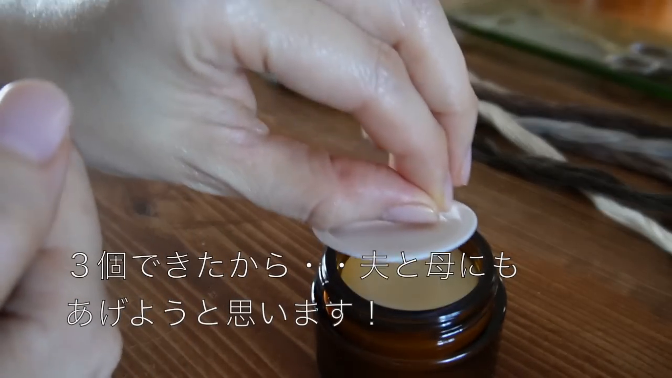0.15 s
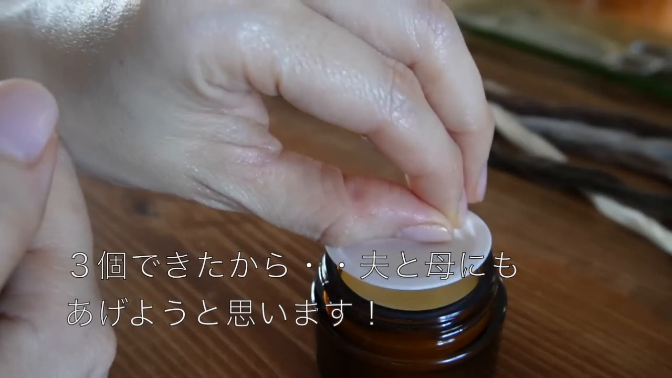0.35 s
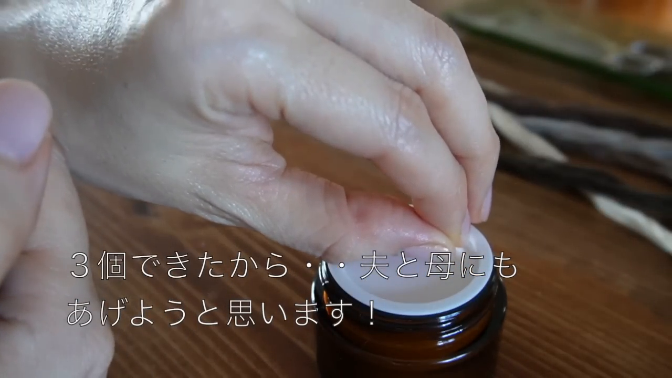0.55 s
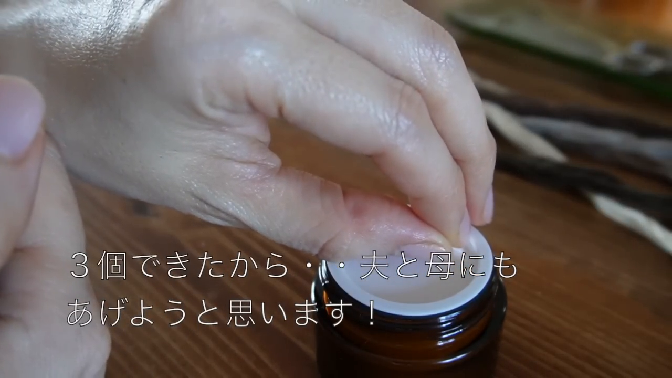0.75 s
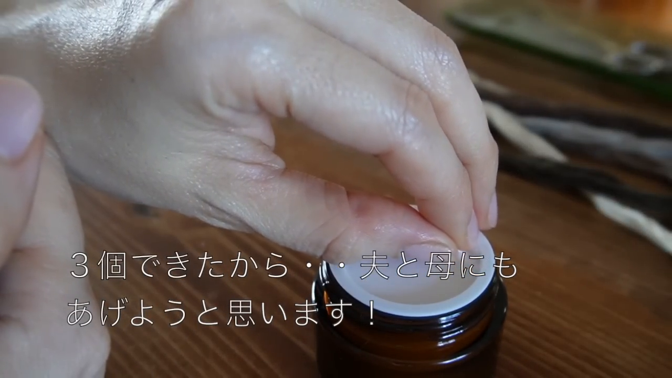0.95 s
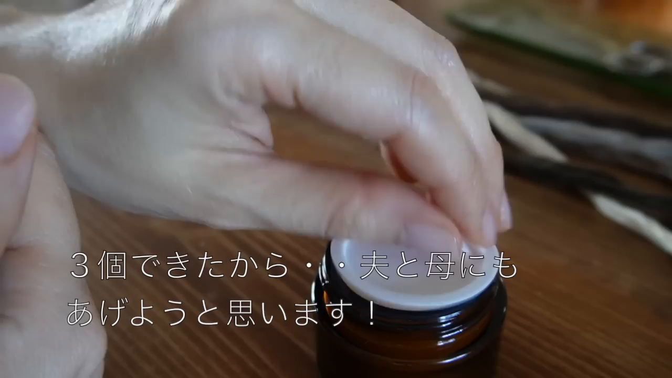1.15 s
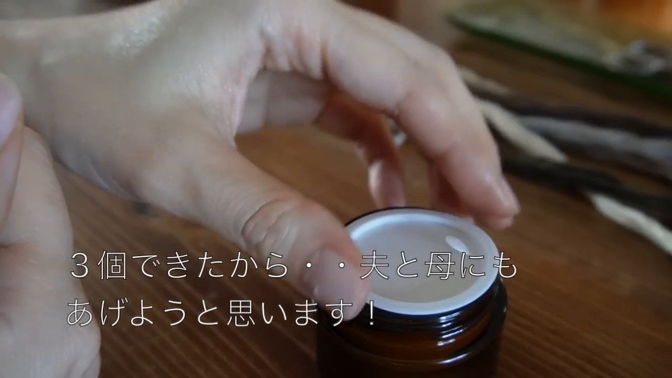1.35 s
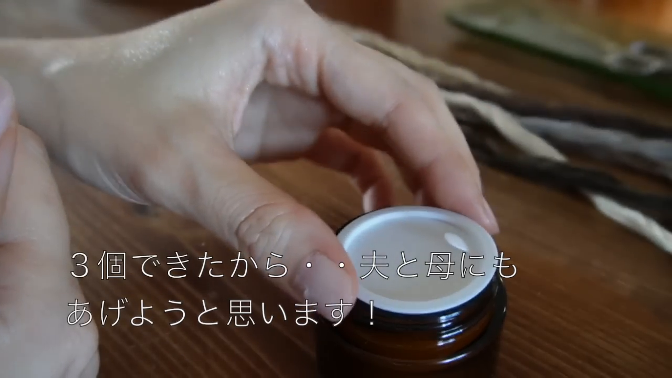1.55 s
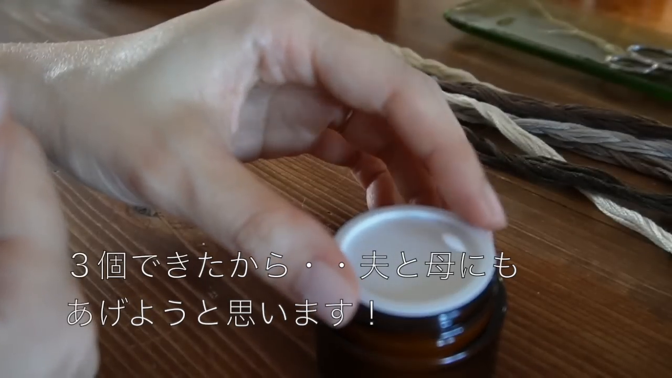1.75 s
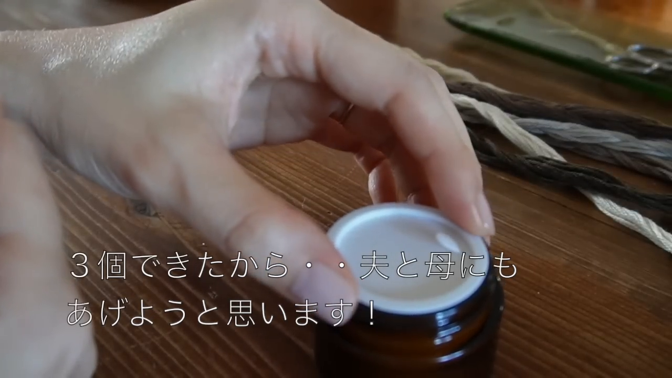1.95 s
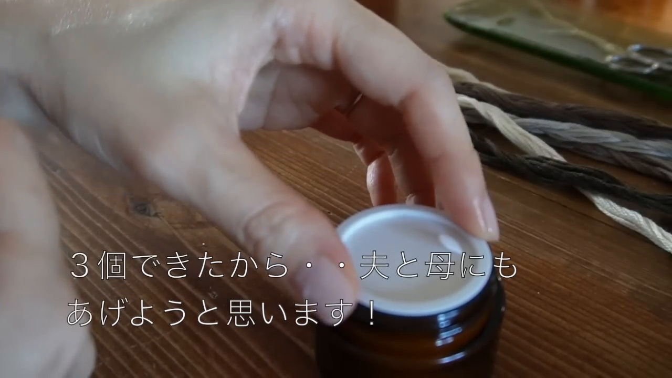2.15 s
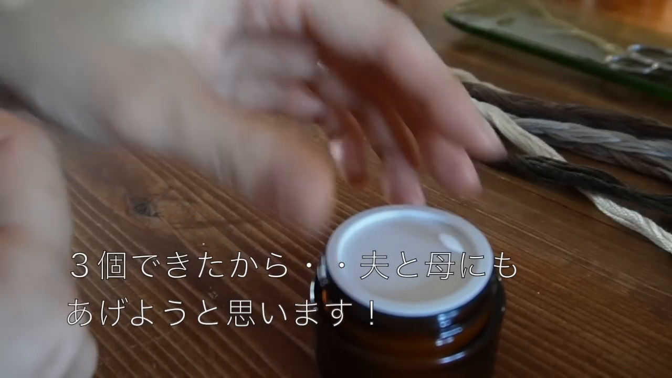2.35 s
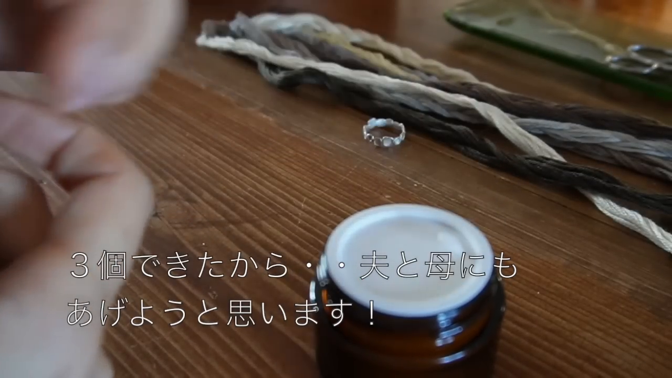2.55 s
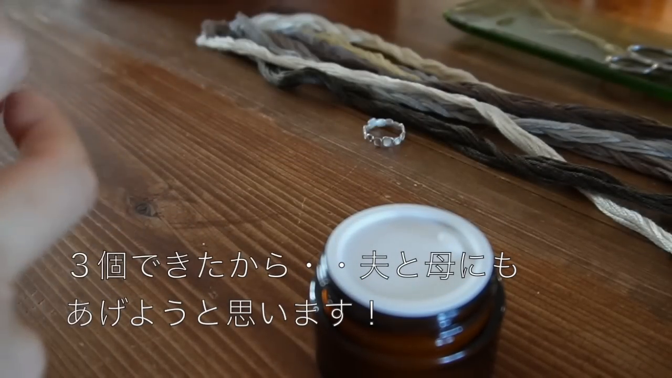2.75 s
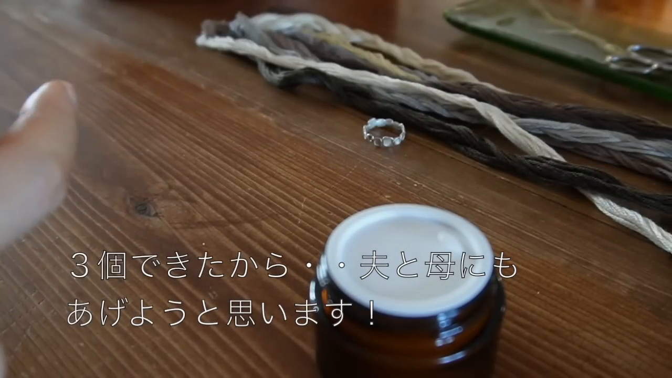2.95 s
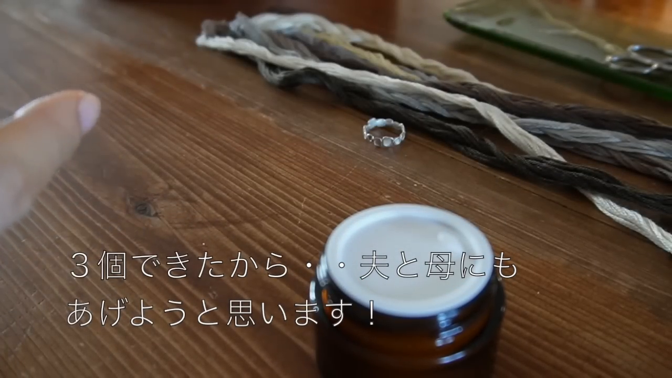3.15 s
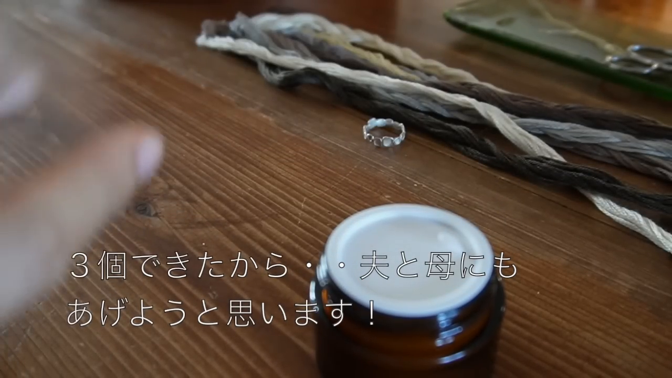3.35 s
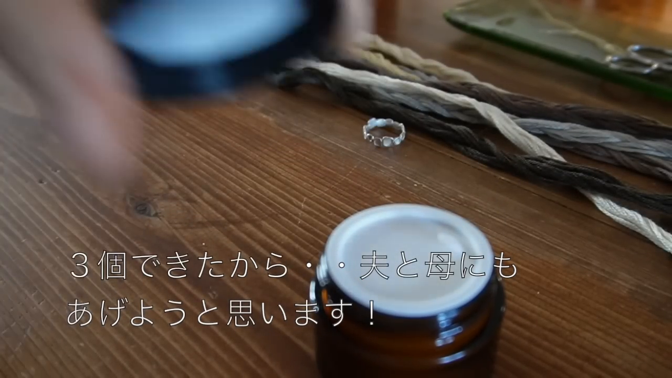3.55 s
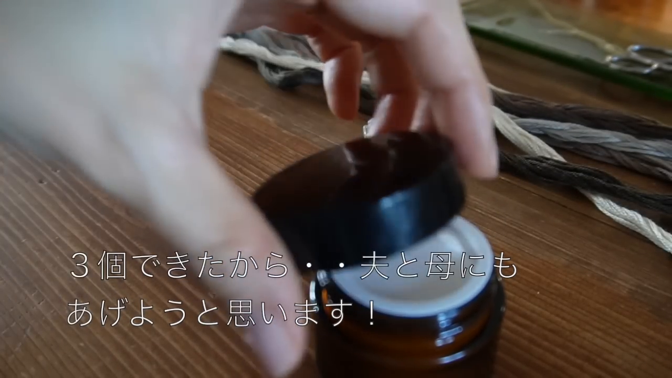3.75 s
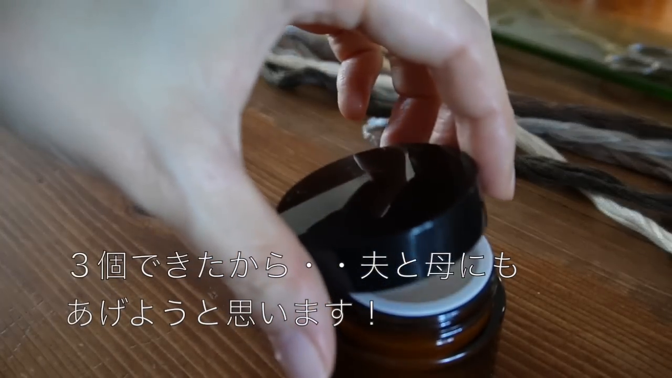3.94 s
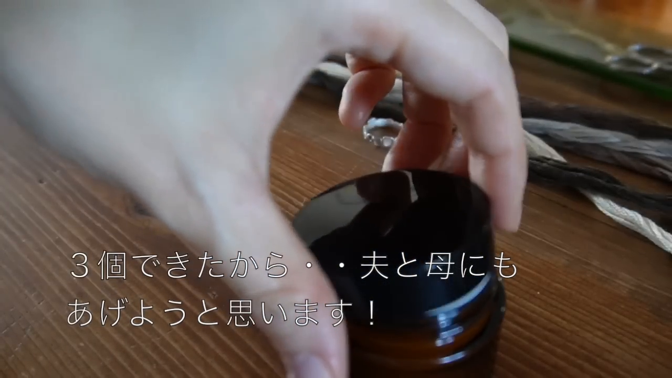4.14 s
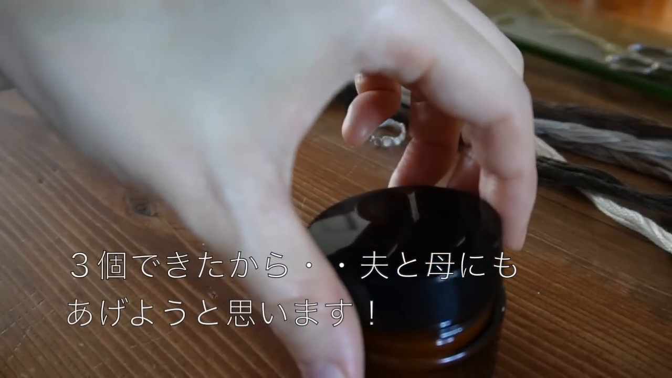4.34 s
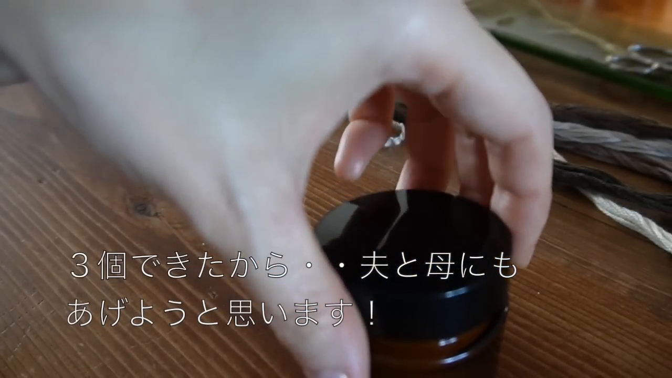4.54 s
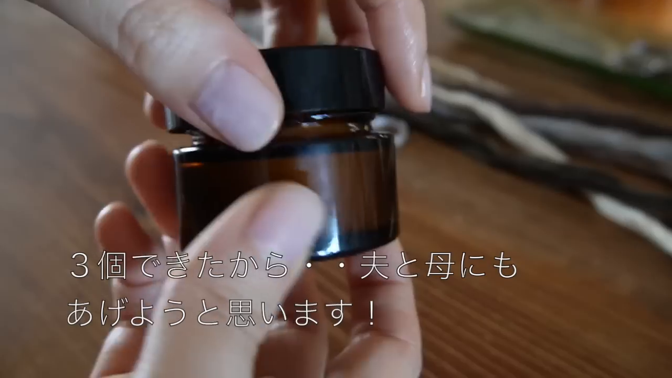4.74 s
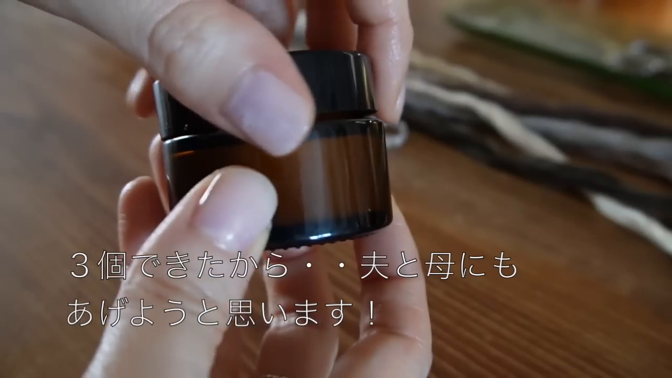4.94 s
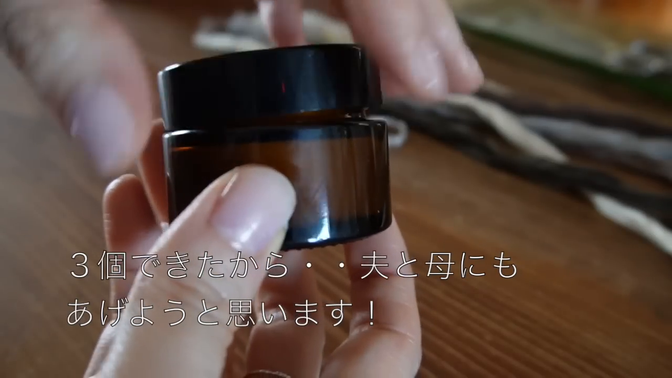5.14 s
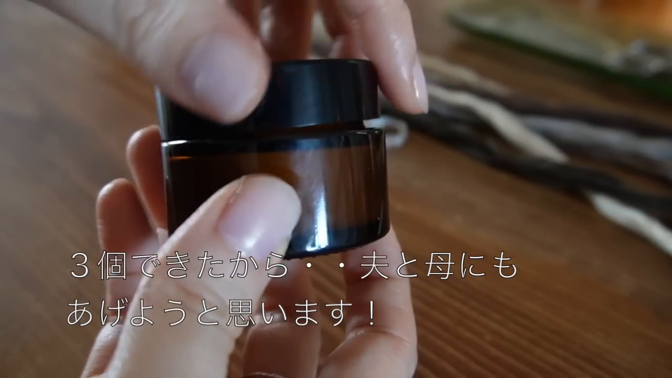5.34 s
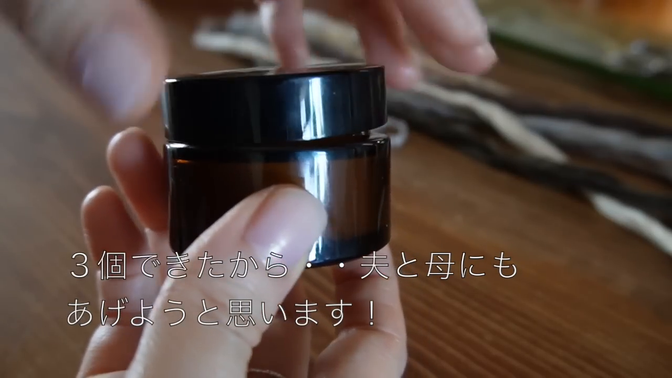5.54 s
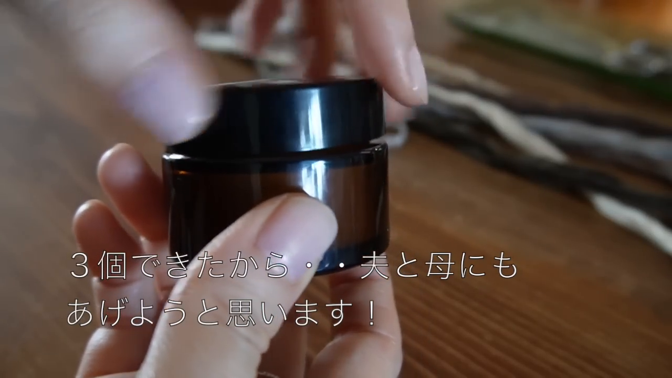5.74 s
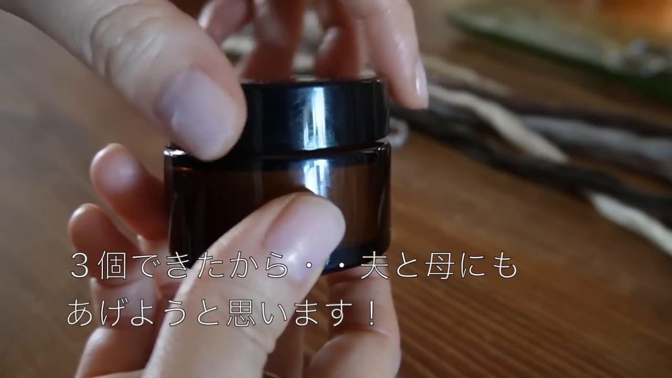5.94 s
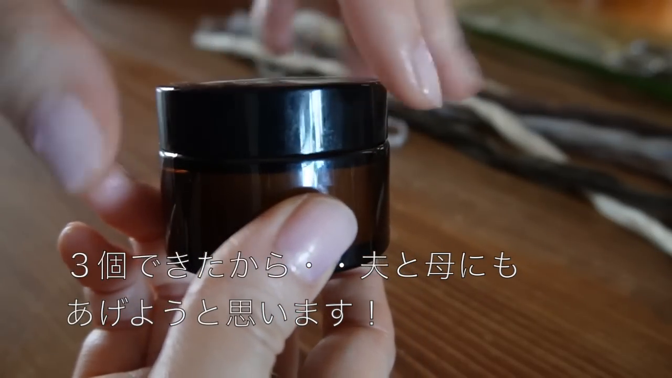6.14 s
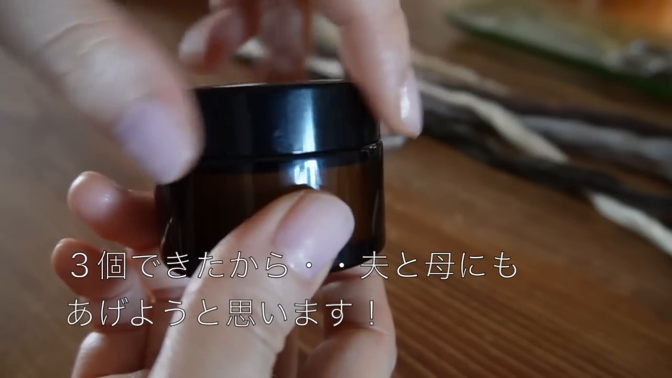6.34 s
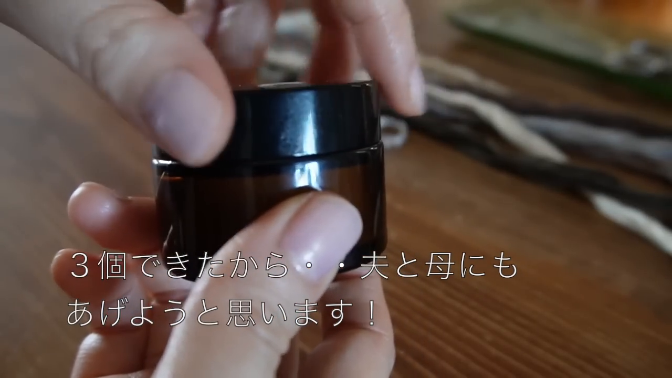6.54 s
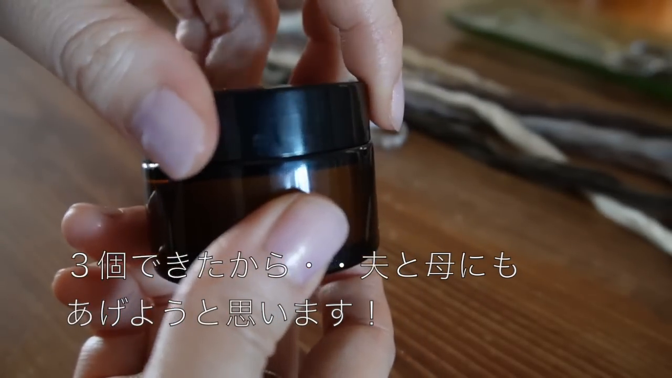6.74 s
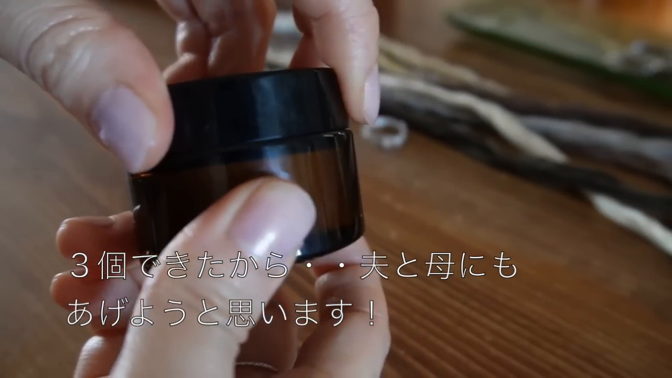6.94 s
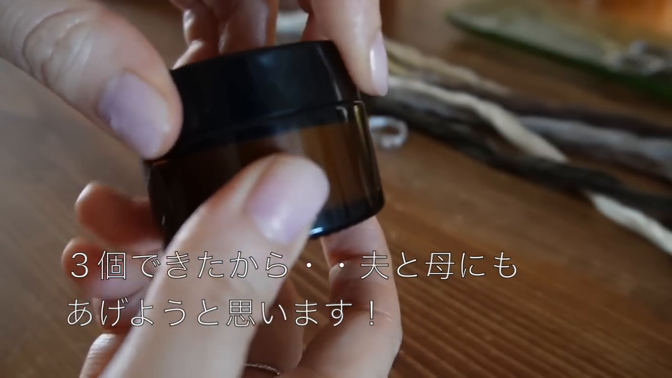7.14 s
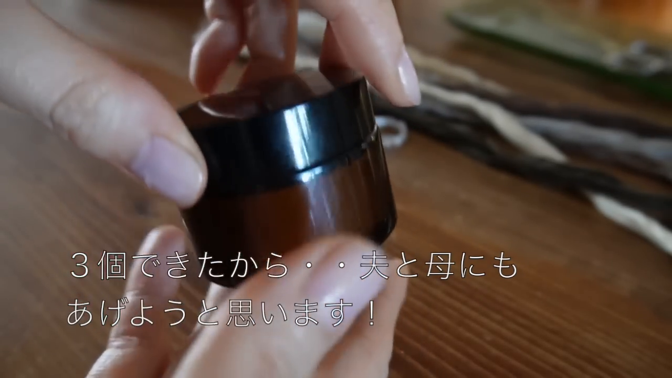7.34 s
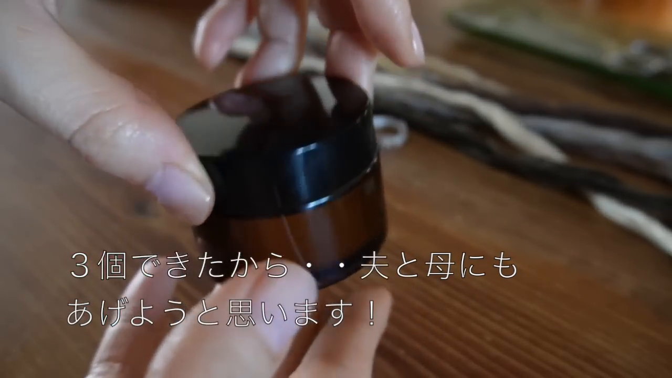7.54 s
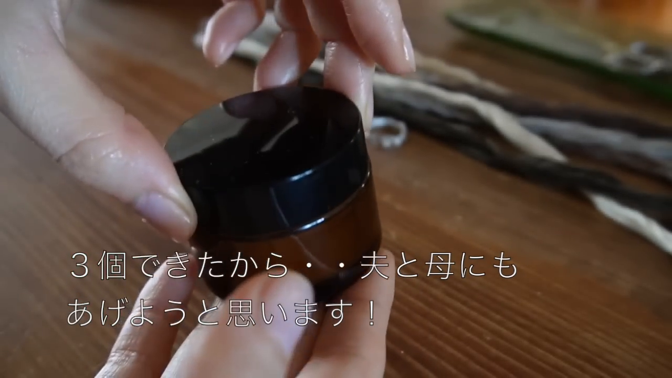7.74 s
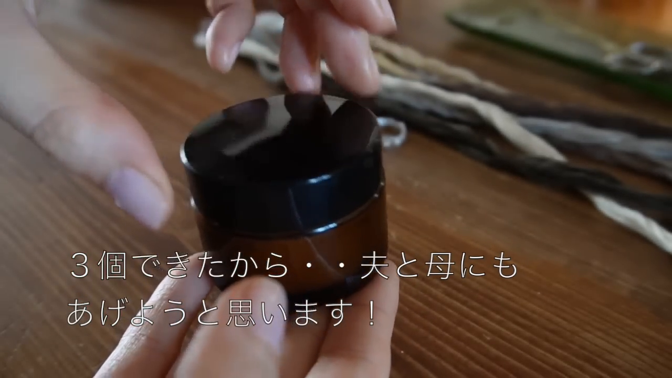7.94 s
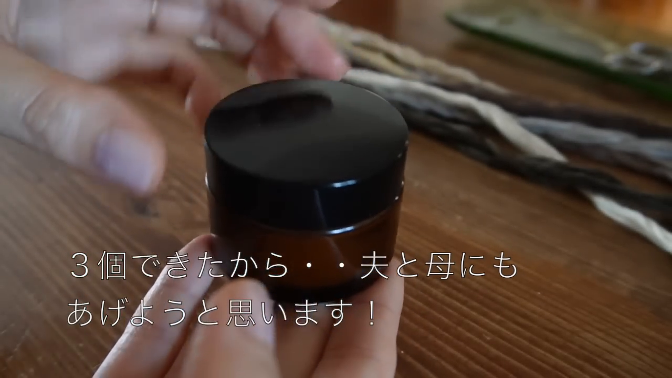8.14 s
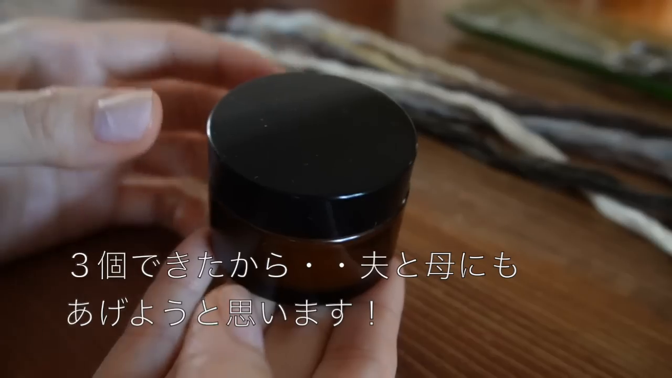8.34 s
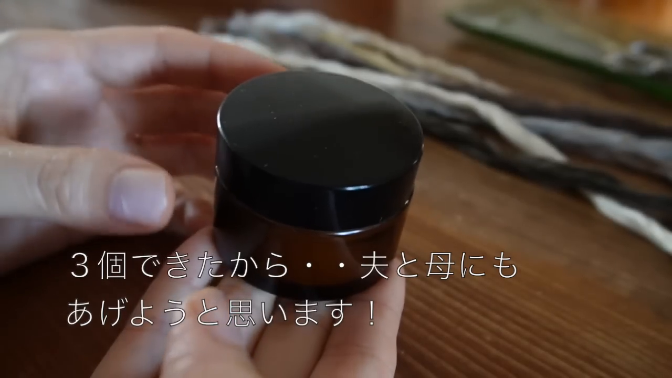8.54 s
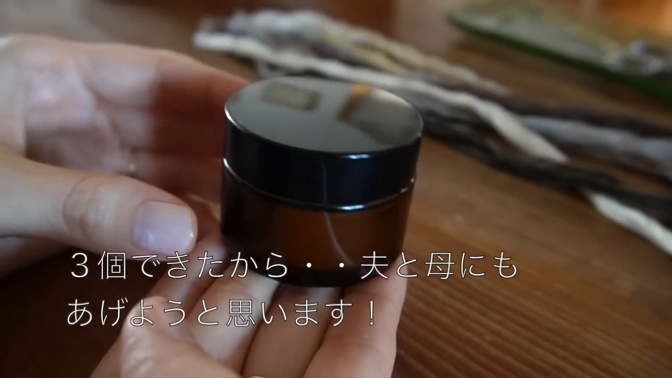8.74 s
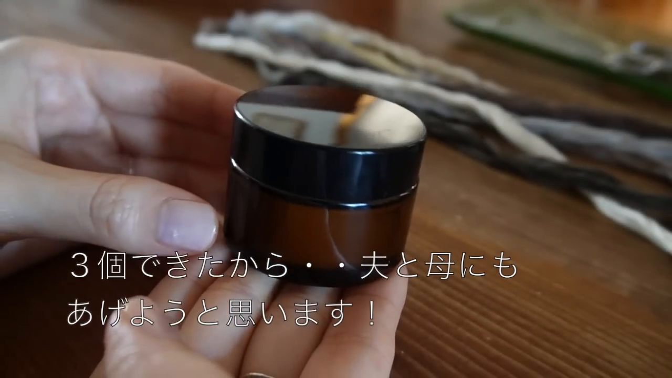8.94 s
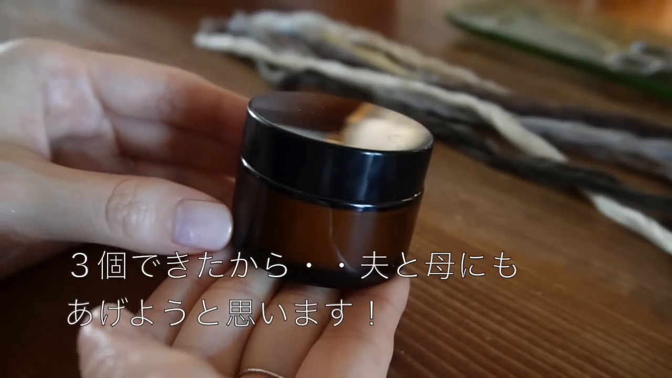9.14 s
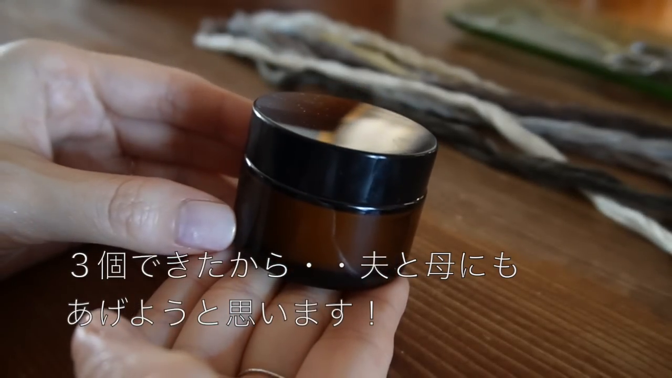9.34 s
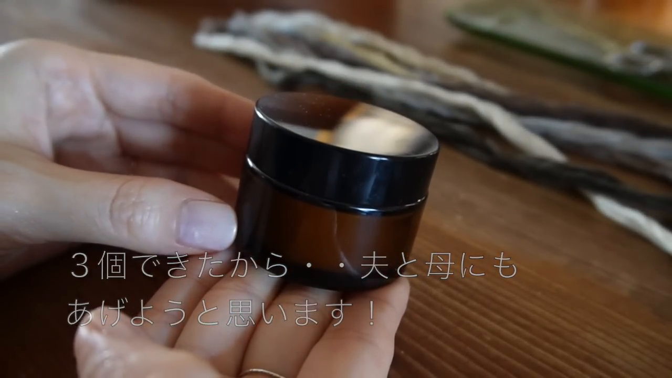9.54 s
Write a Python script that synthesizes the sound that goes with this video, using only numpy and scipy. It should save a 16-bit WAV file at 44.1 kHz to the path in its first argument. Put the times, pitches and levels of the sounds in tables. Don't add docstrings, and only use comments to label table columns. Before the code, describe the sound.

Close view of a small glass jar in a quiet furnished room with soft hiss and a faint steady motor hum. A thin lid is pressed on with one crisp click and tiny ticks. After a pause, a hard plastic cap taps the glass mouth, then is spun in bursts of loud, ringing clacks and short scrapes, getting drier and duller as it tightens. Then only the hum remains.

```python
import sys
import numpy as np
from scipy import signal
from scipy.io import wavfile
from scipy.ndimage import uniform_filter1d

SR = 44100
rng = np.random.default_rng(int(sys.argv[2]) if len(sys.argv) > 2 else 0)


def dump(signal):
    limited = np.clip(np.atleast_2d(signal).T, -1, 1)
    pcm = np.round(limited * 32767).astype(np.int16)
    wavfile.write(sys.argv[1], SR, pcm)


def gain_from_db(level_db):
    decades = np.asarray(level_db, float) / 20
    return 10 ** decades


N = 427329


def rms_one(x):
    return x / np.sqrt(np.mean(x ** 2) + 1e-20)


def at_hz(points, hz):
    curve = np.array(points)
    return np.interp(np.log(hz), np.log(curve[:, 0]), curve[:, 1])


def band_filter(x, low, high):
    return signal.sosfilt(signal.butter(2, [low, high], "band", fs=SR, output="sos"), x)


def drift(rate):
    r = np.exp(-80 * np.pi * rate / SR)
    slow = signal.lfilter([1], [1, -2 * r, r * r], rng.standard_normal(N // 40 + 2002))[2000:]
    return np.interp(np.arange(N) / 40, np.arange(len(slow)), rms_one(slow))


def ring(clicks, hz, t60):
    r = np.exp(-np.log(1000) / (t60 * SR))
    w = 2 * np.pi * hz / SR
    return signal.lfilter([0, np.sin(w)], [1, -2 * r * np.cos(w), r * r], clicks + 1e-18)


# f/Hz, level/dB (per Hz)
AIR = [(20, -37), (45, -17.5), (100, -11), (170, -5), (300, -6), (450, -9), (700, -13), (1000, -13.5),
       (1400, -12.5), (1800, -20), (3000, -25), (6000, -31), (11000, -36.5), (15800, -39.5)]
# f/Hz, likeness (0 to 1)
LIKENESS = [(60, 0.88), (180, 0.96), (550, 0.86), (1650, 0.72), (4970, 0.36), (15000, 0.12)]


def room_noise():
    out, edges = 0, 22 * 2 ** np.arange(0, 9.7, 1 / 3)
    white = rng.standard_normal((2, 2, N))
    for k, (low, high) in enumerate(zip(edges, edges[1:])):
        mid, side = band_filter(white[k % 2], low, high)
        hz = np.sqrt(low * high)
        alike = np.clip(at_hz(LIKENESS, hz), 0, 1)
        gain = gain_from_db(at_hz(AIR, hz) + 1.03 * drift(3))
        out = out + gain * (np.sqrt(1 + alike) * mid + np.sqrt(1 - alike) * side * [[1], [-1]])
    upper = signal.sosfilt(signal.butter(4, 500, "high", fs=SR, output="sos"), out.mean(axis=0))
    return gain_from_db(-57.8) * out / np.std(upper)


# order (multiple of its turning rate), level/dB (rms)
MOTOR = [(3, -62), (4, -54.5), (7, -61), (24, -71.5), (26, -69.5), (28, -77)]
# f/Hz, width/Hz, level/dB (rms)
DRONES = [(180, 4, -71), (300, 8, -68), (524, 8, -69.5)]


def motor():
    turns_per_s = 54.89 * (1 + .0006 * drift(.5))
    turn = 2 * np.pi * np.cumsum(turns_per_s) / SR
    out = 0
    for order, db in MOTOR:
        tone = np.sin(order * turn + rng.uniform(0, 6))
        out = out + np.sqrt(2) * gain_from_db(db + 1.2 * drift(1.5)) * tone
    for hz, width, db in DRONES:
        out = out + gain_from_db(db) * rms_one(ring(rng.standard_normal(N), hz, 2.2 / width))
    return out * gain_from_db(np.array([[.1], [-.1]]))


# low f/Hz, high f/Hz, t60/s, level/dB
ROOM = [(400, 1500, .43, -2.5), (1500, 4000, .41, -3.5), (4000, 8000, .4, .8), (8000, 15000, .27, -1.5)]


def room(x):
    t = np.arange(SR // 2) / SR
    tail = 0
    for low, high, t60, db in ROOM:
        noise = rms_one(band_filter(rng.standard_normal((2, len(t))), low, high))
        tail = tail + gain_from_db(db - 60 * t / t60) * noise * np.sqrt((high - low) / SR)
    mid, side = tail * np.clip((t - .003) / .008, 0, 1)
    return signal.fftconvolve(x[None], [mid + .3 * side, mid - .3 * side], axes=1)[:, :N]


# t/s, f/Hz, level/dB, t60/s
THUDS = [
    (1.219, 263, -46, .25),
    (1.51, 300, -54, .15),
    (4.301, 300, -50, .1),
    (4.493, 300, -44, .15),
    (5.536, 520, -42, .08),
    (5.748, 360, -44, .15),
]


def thuds():
    t, out = np.arange(N) / SR, 0
    for s, hz, db, t60 in THUDS:
        age = np.clip(t - s, 0, None)
        swell = 1 - np.exp(-age / .002)
        out = out + gain_from_db(db - 60 * age / t60) * swell * np.sin(2 * np.pi * hz * age)
    return out


GROUP_EDGES_HZ = [800, 1500, 2300, 3700, 11000]


def group_band(x, group, edges_hz=GROUP_EDGES_HZ):
    return band_filter(x + 1e-18, *edges_hz[group:group + 2])


def knocked(knocks, modes, edges_hz, strike_db, rim_db, crack, crack_hz, damping, detune):
    out, t = np.zeros((2, N + 2048)), np.arange(2048) / SR
    group, hz, level_db, t60 = np.transpose(modes)[:, :, None]
    dull = signal.butter(1, crack_hz, fs=SR, output="sos")
    for s, db, hollow_db, hard_db, ring_ms in knocks:
        peak_db = [db + hollow_db, db, db + rim_db + .55 * hard_db, db + hard_db]
        scatter, shift, lean, sign = rng.standard_normal((4, len(modes), 1))
        choke = np.exp(-.55 * (t * 1000 / np.clip(ring_ms, 2, 9)) ** 2.4) + .012
        fade = np.exp(-np.log(1000) * damping * (1 + hz / 5500) * t / t60)
        onset = 1 - np.exp(-t * hz / 1.6)
        sines = np.sin(2 * np.pi * hz * (1 + detune * shift) * t)
        rings = np.sign(sign) * gain_from_db(level_db + 2.5 * scatter) * fade * onset * choke * sines
        beam = np.clip(hz / 25000, 0, .8) * lean
        burst = signal.sosfilt(dull, np.exp(-t / .0018) * rng.standard_normal((2, len(t))))
        start = int(s * SR)
        for g in range(4):
            inside = group[:, 0].astype(int) == g
            mid, side = rings[inside].sum(axis=0), (beam * rings)[inside].sum(axis=0)
            snap = group_band(burst, g, edges_hz)
            snap = crack * (1 + .3 * g) * np.abs(mid).max() / np.abs(snap[0]).max() * snap
            mid, side = mid + snap[0], side + .05 * (1 + g) * snap[1]
            gain = gain_from_db(peak_db[g] + strike_db) / np.abs(mid).max()
            out[:, start:start + len(t)] += gain * np.array([mid + side, mid - side])
    return out[:, :N]


# t/s, level/dB (main mode), hollowness/dB (air modes above it),
# hardness/dB (high modes above it), ring/ms
LID_KNOCKS = [(0.5563, -43, 11, -2, 3.2), (1.2191, -24.5, 0.1, -1, 3.2), (1.2276, -43, 7, 0, 6.3),
              (1.2493, -31, -9, -14, 1.5), (1.256, -38, -4, -12, 3.2), (1.2601, -43, 1, -8, 9),
              (1.2666, -44, 3, -11, 4.1), (1.5095, -45, 2, -17, 7.4), (1.5143, -52, 8, -14, 3.6),
              (1.7974, -56, 15, -9, 3.4), (2.3083, -58, 5, -2, 9), (2.6054, -56, 1, 0, 5.8),
              (2.8498, -52, -5, -14, 3.9)]
# group (0 air, 1 main, 2 rim, 3 high), f/Hz, level/dB, t60/s
LID_MODES = [(0, 1330, -.6, .03), (0, 1150, -7, .02), (1, 2580, 1.5, .04), (1, 2150, -5, .015),
             (2, 3400, -3.5, .015), (2, 4080, -2.5, .014), (3, 5500, -3.5, .012), (3, 6500, -2.5, .012),
             (3, 7300, -4, .01), (3, 9200, -6, .008)]
LID_EDGES_HZ = [900, 1800, 3000, 5000, 11000]


def pressed_lid():
    return knocked(LID_KNOCKS, LID_MODES, LID_EDGES_HZ, strike_db=1.5, rim_db=6,
                   crack=.8, crack_hz=4500, damping=.65, detune=.015)


def strokes(rows, lift, fade_db):
    power, t = np.zeros(N), np.arange(N) / SR
    for s, length, rising, db, hard_db in rows:
        inside = slice(int(s * SR), int((s + length) * SR))
        top = s + length * np.clip(rising, .02, .98)
        away = np.interp(t[inside], [s, top, s + length], [1, 0, 1])
        power[inside] += gain_from_db(db + lift * hard_db - fade_db * away ** 1.5) ** 2
    return uniform_filter1d(np.sqrt(power), size=132)


def grains(per_s, spread_db):
    sizes = gain_from_db(spread_db * np.minimum(rng.exponential(1, N), 4)) * rng.choice([-1, 1], N)
    return rms_one(sizes * (rng.random(N) < per_s / SR))


# group (0 air, 1 main, 2 rim, 3 high), f/Hz, level/dB, t60/s
CAP_MODES = [(0, 850, -5, .04), (0, 1020, -11, .03), (0, 1200, -2.5, .045), (0, 1320, -3, .045),
             (1, 1600, -13, .04), (1, 1700, -13, .05), (1, 1790, -.6, .11), (1, 1865, -10, .06),
             (2, 2880, -7, .03), (2, 3250, -2.5, .045), (3, 3860, -7, .022), (3, 4430, -5, .03),
             (3, 4820, -6, .03), (3, 5250, -7, .025), (3, 5920, -12, .022), (3, 6430, -8.5, .024),
             (3, 7130, -15, .022), (3, 8050, -7, .026), (3, 8900, -15, .018), (3, 10400, -11.5, .018),
             (3, 12000, -18, .015)]
HARD_LIFTS = [-1.1, 0.05, .2, .9]


def scraped(rows, colour_db, fade_db, dry, per_s, spread_db):
    busy = slice(int(rows[0][0] * SR) - 999, int(rows[-1][0] * SR) + SR // 2)
    slips, other = grains(per_s, spread_db)[busy], grains(per_s, spread_db)[busy]
    out = np.zeros((2, N))
    dry = (dry * np.ones(N))[busy]
    both = np.array([slips, other])
    rim = signal.sosfilt(signal.butter(3, 5700, fs=SR, output="sos"), both) + .22 * both
    for group in range(4):
        gain = gain_from_db(colour_db[group]) * strokes(rows, HARD_LIFTS[group], fade_db)[busy]
        drive = gain * slips * np.sqrt(np.clip(1 - dry ** 2, 0, 1))
        rung, power, sign = 0, 0, 1
        for _, hz, db, t60 in [m for m in CAP_MODES if int(m[0]) == group]:
            held = t60 * .6
            rung = rung + sign * gain_from_db(db) * ring(drive, hz, held)
            power += gain_from_db(2 * db) * held * SR / (4 * np.log(1000))
            sign = -sign
        mid, side = group_band(gain * rim, group) / np.std(group_band(rim[0, :SR], group))
        out[:, busy] += rung / np.sqrt(power) + dry * mid + (.04 + .07 * group) * side * [[1], [-1]]
    return out


# t/s (start), length/s, share spent rising, level/dB (peak), hardness/dB
RUBS = [(0.43, .12, .45, -63, -7), (1.22, .16, .15, -56, -2.5), (2.29, .05, .4, -67, 0.1),
        (2.78, .25, .4, -65, -3), (4.995, .125, .62, -48, 1), (5.365, .09, .7, -44, -3.5),
        (5.405, .11, .6, -48, 4), (6.0, .105, .6, -50, 2), (6.325, .045, .6, -53, -4)]
RUB_COLOUR_DB = [-3, 0.1, -2, 0.1]


def rubbing():
    patches = gain_from_db(2.1 + 2.1 * drift(60))
    return patches * scraped(RUBS, RUB_COLOUR_DB, fade_db=13, dry=.98, per_s=7000, spread_db=2.4)


# t/s (start), length/s, share spent rising, level/dB (peak), hardness/dB
SCRAPES = [(4.27, .028, .4, -41, -8), (4.295, .13, .3, -55, -7), (4.772, .026, .4, -28, -3),
           (4.803, .028, .1, -42, -3), (4.83, .045, .4, -51, 1), (5.113, .031, .35, -21, 5),
           (5.498, .034, .3, -25, -1), (5.72, .027, .85, -48, -4), (5.755, .022, .3, -29, 2.5),
           (5.775, .034, .45, -29, 0.1), (6.01, .04, .68, -42, -7), (6.028, .064, .6, -34, 4),
           (6.32, .05, .65, -48, -2)]
SCRAPE_COLOUR_DB = [-5, 0.1, -7, -9]


def thread():
    dry = np.interp(np.arange(N) / SR, [4.5, 4.7, 5.6, 5.95], [.85, .6, .78, .985])
    return gain_from_db(1.2) * scraped(SCRAPES, SCRAPE_COLOUR_DB, fade_db=15, dry=dry, per_s=5000, spread_db=2.8)


# t/s, level/dB, hollowness/dB, hardness/dB, ring/ms
SET_KNOCKS = [(4.2772, -39, 5, -14, 9), (4.2813, -38, 6, -12, 8.2), (4.3006, -39, 15, -11, 4.3),
              (4.3391, -50, 6, -3, 3.5), (4.3693, -56, 15, -6, 9), (4.4126, -34, -2, -9, 3.3),
              (4.437, -50, 5, 0, 5.9), (4.4557, -29, -3, -8, 2.6), (4.493, -33, 8, 5, 3.1),
              (4.4993, -49, 13, 1, 6.7), (4.5073, -51, 5, 1, 9)]
# group, f/Hz, level/dB, t60/s
SET_MODES = [(0, 900, -17, .018), (0, 1270, -.6, .035), (1, 1850, -5, .022), (1, 2350, -1.5, .022),
             (2, 3000, -6, .015), (2, 3350, -1.5, .025), (3, 4600, -3, .015), (3, 5200, -4, .015),
             (3, 6400, -9, .012), (3, 8100, -18, .012), (3, 10400, -17, .012)]
SET_EDGES_HZ = [900, 1600, 2700, 3800, 9000]


def seated_cap():
    return knocked(SET_KNOCKS, SET_MODES, SET_EDGES_HZ, strike_db=1.5, rim_db=4,
                   crack=.7, crack_hz=2200, damping=.65, detune=.015)


# t/s, level/dB, hollowness/dB, hardness/dB, ring/ms
TIGHT_KNOCKS = [(6.0271, -50, 11, 3, 8.9), (6.0353, -35, 13, -5, 6.4), (6.0503, -36, -3, -3, 8.9),
                (6.0649, -34, 5, -1, 8.9), (6.3358, -47.5, 1, -7, 8.9), (6.354, -33, 1, -6, 8.9)]


def tight_cap():
    return knocked(TIGHT_KNOCKS, CAP_MODES, GROUP_EDGES_HZ, strike_db=1.2, rim_db=4.5,
                   crack=1.1, crack_hz=2200, damping=1.6, detune=.05)


# t/s, level/dB,
# hollowness/dB, hardness/dB, ring/ms
CAP_KNOCKS = [(4.7759, -22, -10, -7, 6.4), (4.7984, -18.5, -13, -19, 3.4), (4.8053, -39, -1, 1, 3.8),
              (4.8142, -41, 0.1, -9, 6.0), (4.8463, -43, 2, 1, 6.4), (4.9032, -33, -6, -4, 4.0),
              (5.1023, -35.5, -2, -5, 4.7), (5.1157, -24.5, -9, 4, 8.9), (5.1203, -18.5, -13, 4, 8.9),
              (5.1323, -21.5, -18, 7, 5.0), (5.1475, -10.5, -12, -11, 6.0), (5.1607, -5, -10, -6, 8.7),
              (5.1725, -15.5, -7, -9, 8.9), (5.1876, -11.5, -15, -9, 6.2),
              (5.3361, -17.5, -13, -4, 8.9), (5.3393, -23.5, -15, -5, 7.8), (5.3776, -33, -13, -8, 6.0),
               (5.5009, -19, -2, -14, 8.9), (5.5075, -12, -14, -14, 8.9), (5.5173, -32, -6, 3, 8.9),
               (5.5359, -6.5, -11, -1, 5.3), (5.7378, -40, 9, -20, 5.1), (5.7471, -11.5, -2, 2.5, 3.1),
               (5.7523, -13, -9, -8, 7.4), (5.7798, -15.5, -4, -8, 5.2), (5.7888, -32, 9, 4, 8.9),
               (5.7963, -36, 10, 0.1, 8.9)]


def loose_cap():
    return knocked(CAP_KNOCKS, CAP_MODES, GROUP_EDGES_HZ, strike_db=.3, rim_db=-2.5,
                   crack=.6, crack_hz=7000, damping=.46, detune=.011)


def scene():
    jar = pressed_lid() + rubbing() + thread() + seated_cap() + tight_cap() + loose_cap()
    jar = band_filter(jar, 450, 12500)
    highs = signal.sosfilt(signal.butter(2, 7000, "high", fs=SR, output="sos"), jar)
    near = jar * gain_from_db(np.array([[.45], [-.45]])) + .15 * highs * [[-1], [1]]
    echoes = gain_from_db(-38) * room(jar.mean(axis=0))
    return room_noise() + motor() + echoes + thuds() + near


def top_cut(x):
    return signal.sosfilt(signal.butter(12, 16480, fs=SR, output="sos"), x)


def record(dry):
    mix = signal.sosfilt(signal.ellip(10, .5, 60, 15800, fs=SR, output="sos"), dry)
    return top_cut(mix)


dry = scene()
out = record(dry)
dump(out)
```